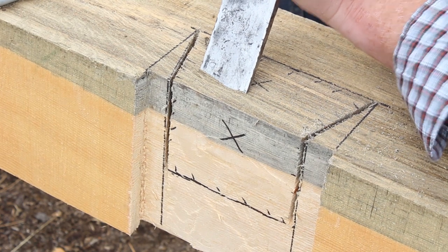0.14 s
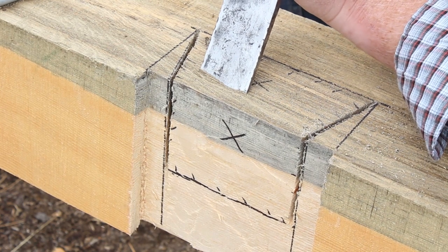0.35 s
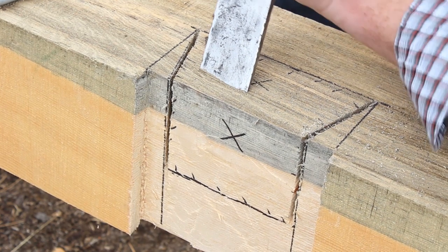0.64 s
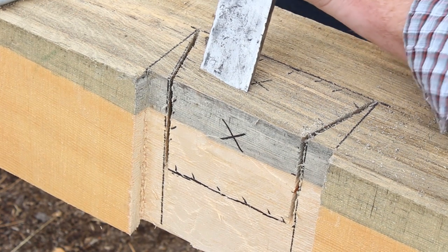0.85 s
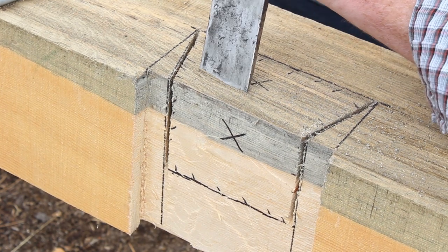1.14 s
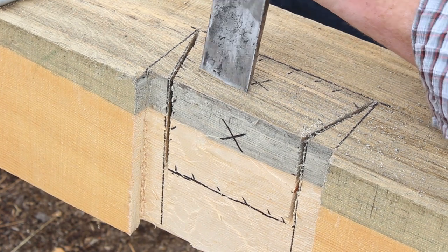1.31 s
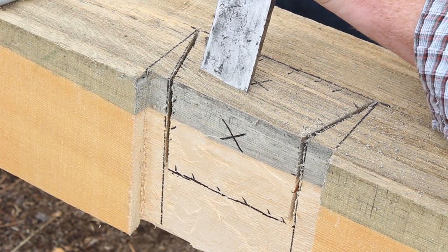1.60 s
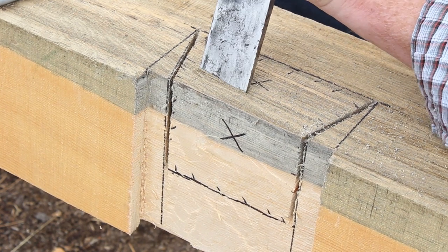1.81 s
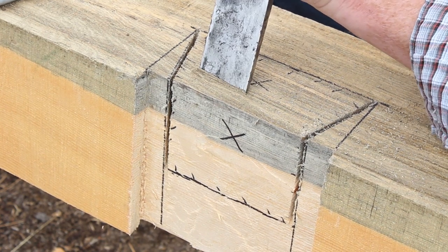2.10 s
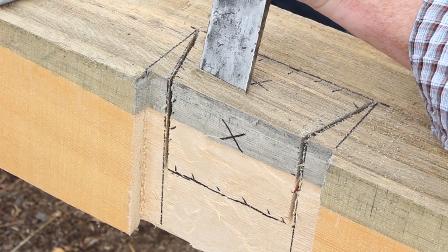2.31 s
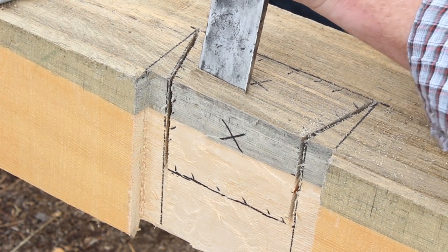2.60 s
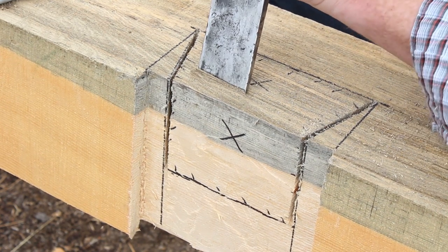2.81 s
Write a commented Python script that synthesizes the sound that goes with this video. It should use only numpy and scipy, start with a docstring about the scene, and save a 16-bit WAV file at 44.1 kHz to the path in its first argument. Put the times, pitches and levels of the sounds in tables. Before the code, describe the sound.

Mallet striking a chisel in a timber beam, woody knocks with rattle, a far bird whistling outdoors

```python
"""Quiet outdoor air carries the tail of a mallet blow, then six more blows on a chisel in a timber beam.
Each blow layers a noise crack with ringing handle modes, a beam thump and a short bedded-chisel ring.
The jolted trestles sway as wavering modes, shudder in noise knocks and rattle in a chatter of ticks;
a faint noise wash answers from the yard. Between the early blows a far bird whistles in gliding sines
with an echo, and the filtered-noise air swells slowly, then eases."""
import sys
import numpy as np
from scipy import signal
from scipy.fft import rfft, irfft, next_fast_len
from scipy.io import wavfile

SR = 44100
rng = np.random.default_rng(int(sys.argv[2]) if len(sys.argv) > 2 else 0)


def log_audio(samples):
    """Write samples as a 16-bit WAV file to the path given in sys.argv[1]."""
    # one column per channel
    frames = np.atleast_2d(samples).T
    # limit to full scale, then quantise
    limited = np.clip(frames, -1, 1)
    pcm = np.round(limited * 32767).astype(np.int16)
    wavfile.write(sys.argv[1], SR, pcm)


N = 130095
T = np.arange(N) / SR

# mallet blows: (t/s, thump/dB, chisel ring/dB, crack/dB, crack edge/dB, shudder/dB, rattle/dB,
# beam pitch/ratio, chisel pitch/ratio, blade/dB, chisel ring time/ratio), levels relative to each layer
BLOWS = [(-.07, 10, -4, 0.5, 0, -1, -4, 0.41, 1, 0, 1),
         (0.2011, -1.5, 4, 1.5, -5, -2.5, -1, 1.076, 1.065, -13.5, 0.85),
         (1.3217, -8.5, -17.5, -7, -3.5, -12, -7.5, 1.1, 0.988, -28, 3.44),
         (1.7305, -7.5, 0.5, 3, -4, -4, -7.5, 1.03, 1.0, -3, 1.13),
         (2.0229, 0, 8.5, 0, 2, -0.5, -19, 1.0, 1.04, 1.5, 0.33),
         (2.3234, -1, -1.5, 0, 1.5, 1.5, -0.5, 1.03, 1, 4.5, 1.1),
         (2.6155, -0.5, -1.5, 1, 1.5, 2, -0.5, 1.05, 0.97, 3, 1.03)]


def amp(db):
    """Decibels to gain."""
    return 10 ** (np.asarray(db) / 20)


def over_hz(points, hz):
    """Read (f/Hz, value) points on a log-frequency axis."""
    f, v = np.array(points, float).T
    return np.interp(np.log(np.maximum(hz, 1)), np.log(f), v)


def colour(x, points):
    """Minimum-phase filter of unit energy; the (f/Hz, level/dB) points set only its spectral shape."""
    size = 2048
    cepstrum = irfft(np.log(amp(over_hz(points, np.fft.rfftfreq(size, 1 / SR)))))
    # fold the cepstrum forward in time so the filter is causal
    cepstrum[1:size // 2] *= 2
    cepstrum[size // 2 + 1:] = 0
    response = irfft(np.exp(rfft(cepstrum)))
    return signal.fftconvolve(x, response / np.linalg.norm(response))[:len(x)]


def envelope(rise_s, t60_s):
    """Exponential rise and 60 dB fall, one second long; rise_s is a time constant."""
    t = T[:SR]
    rise = 1 - np.exp(-t / rise_s)
    return rise * np.exp(-np.log(1000) * t / t60_s)


def burst(rise_s, t60_s):
    """Dying white noise."""
    return rng.standard_normal(SR) * envelope(rise_s, t60_s)


def clicks(per_s):
    """One second of sparse random clicks, scaled to unit power on average."""
    struck = rng.random(SR) < per_s / SR
    return struck * rng.standard_normal(SR) * np.sqrt(SR / per_s)


def drift(per_s):
    """One second of random wandering, straight lines between per_s random points."""
    return np.interp(T[:SR] * per_s, np.arange(per_s + 1), rng.standard_normal(per_s + 1))


def ring(modes, pitch, rise_s, wander=0, beat_db=0):
    """Struck modes with levels scattered from blow to blow; loose joints make pitch and level wander."""
    scatter_db = 1.2
    out = 0
    for hz, db, t60 in modes:
        bend, swell = drift(20), drift(20)
        phase = 2 * np.pi * hz * np.cumsum(pitch + wander * bend) / SR
        level_db = db + scatter_db * rng.standard_normal() + beat_db * swell
        out = out + amp(level_db) * envelope(rise_s, t60) * np.sin(phase)
    return out


def add(out, start_s, x):
    """Mix x into out at a time, trimming what falls outside."""
    i = int(round(start_s * SR))
    a, b = max(i, 0), min(i + len(x), N)
    out[a:b] += x[a - i:b - i]


def air():
    """Soft outdoor wash: coloured noise in mid and side, swelling slowly."""
    # outdoor air spectrum: (f/Hz, relative level/dB)
    air_shape = [(25, -19), (59, -12), (145, -13), (404, -8.5), (822, -16.5), (1760, -17), (16000, -37.5)]
    # slow swell of the wash: (t/s, mid level/dB)
    air_swell = [(0, -57.5), (.9, -54), (1.65, -56.5)]
    side_gain = 0.89
    mid, side = (colour(rng.standard_normal(N), air_shape) for _ in range(2))
    swell = amp(np.interp(T, *np.array(air_swell).T))
    return swell * (mid + side_gain * np.array([side, -side]))


def bird():
    """Far pure whistles that glide, waver and flutter, with a diffuse echo from the trees."""
    # notes: (start t/s, length/s, start f/Hz, middle f/Hz, end f/Hz, level/dB), before waver and flutter
    notes = [(0.374, 0.1, 2690, 2690, 2440, -48.5), (0.459, 0.025, 2260, 1930, 1870, -44),
             (0.516, 0.028, 2400, 2870, 2780, -46.5), (.54, 0.027, 2450, 2107, 1980, -45.5),
             (0.956, 0.13, 2900, 3000, 3250, -55), (0.945, .11, 2130, 2310, 2390, -53.5),
             (1.066, 0.031, 2700, 2580, 2600, -45), (1.089, 0.038, 2780, 3140, 3120, -44),
             (1.126, 0.062, 2663, 2622, 2340, -44), (1.18, .06, 2400, 2350, 2290, -53),
             (1.241, 0.022, 2600, 1750, 1400, -50), (1.569, 0.034, 3300, 2590, 2850, -52)]
    waver_depth, flutter_db, waver_points_per_s = .014, 2, 150
    right_over_left_db, echo_db = 8.5, -5
    song = np.zeros(N)
    for start_s, length_s, start_hz, middle_hz, end_hz, db in notes:
        u = np.linspace(0, 1, int(length_s * SR))
        glide = np.polyfit([0, .5, 1], [start_hz, middle_hz, end_hz], 2)
        waver, flutter = (drift(waver_points_per_s)[:len(u)] for _ in range(2))
        hz = np.polyval(glide, u) * (1 + waver_depth * waver)
        whistle = np.sin(np.pi * u) * np.sin(2 * np.pi * np.cumsum(hz) / SR)
        add(song, start_s, amp(db + flutter_db * flutter) * whistle)
    direct = song * amp(np.array([[-right_over_left_db], [right_over_left_db]]) / 2)
    # one independent echo tail per side
    trees = [burst(rise_s=0.024, t60_s=1) for _ in range(2)]
    echo = np.array([signal.fftconvolve(song, h / np.linalg.norm(h))[:N] for h in trees])
    return direct + amp(echo_db) * echo


def yard():
    """Scattered reflections as a slow-rising noise tail on each blow, for one microphone."""
    # yard reflection spectrum: (f/Hz, relative level/dB)
    yard_shape = [(100, -1.5), (300, 1), (900, -2), (2500, -10.5), (7000, -19.5), (15000, -49)]
    yard_db = -37
    out = np.zeros(N)
    for t, _, _, crack_db, *_ in BLOWS:
        add(out, t, amp(yard_db + crack_db) * burst(rise_s=0.024, t60_s=0.48))
    return colour(out, yard_shape)


def sway():
    """Jolted trestles rock in slow-rising, wandering modes; the beam drops back with small knocks."""
    # trestle modes: (f/Hz before the pitch ratio, level/dB before the blow's level, t60/s)
    trestle_modes = [(72.2, -23, 0.64), (138, -43.5, 1), (189.26, -26, 0.45), (280.7, -23.5, 0.37),
                     (395, -27.5, 0.37), (501, -26, 0.27)]
    # wooden knocks as the beam drops back: (t/s, level/dB added to its modes)
    rebounds = [(1.762, -4), (1.812, -10), (1.833, -13), (2.056, -2), (2.355, 1), (2.647, 1.5)]
    # modes of those knocks: (f/Hz, level/dB before each knock's level, t60/s)
    knock_modes = [(637, -27, 0.086), (943, -25.5, 0.07), (1082, -24.5, 0.062), (1243, -35.5, 0.13)]
    out = np.zeros(N)
    for t, _, _, _, _, shudder_db, *_ in BLOWS:
        rocking = ring(trestle_modes, pitch=0.97, rise_s=0.037, wander=.015, beat_db=3)
        add(out, t, amp(shudder_db) * rocking)
    for t, db in rebounds:
        add(out, t, amp(db) * ring(knock_modes, pitch=1, rise_s=0.0018))
    return out


def shudder():
    """The beam shudders on its trestles: dense random knocks that die away, darkened by a filter."""
    # shudder spectrum: (f/Hz, relative level/dB)
    shudder_shape = [(60, -14.5), (110, 3.5), (190, 7.5), (290, -6), (450, -4.5), (750, -6), (1200, -18),
                     (3000, -28), (8000, -50)]
    base_db, knocks_per_s = -23, 990
    out = np.zeros(N)
    for t, _, _, _, _, shudder_db, *_ in BLOWS:
        knocks = clicks(knocks_per_s) * envelope(rise_s=.012, t60_s=0.4)
        add(out, t, amp(base_db + shudder_db) * knocks)
    return colour(out, shudder_shape)


def tick():
    """A sharp contact spike and its short noise scrape."""
    snap = 3.5  # spike height over the scrape's noise
    return snap * signal.unit_impulse(SR) + burst(rise_s=.0002, t60_s=.019)


def rattle():
    """Loose parts chatter as a swelling cloud of ticks, with clear single ticks on top."""
    # clearest ticks: (t/s, level/dB added to the tick base level)
    clear_ticks = [(.215, -2), (.2465, 0), (.2735, 1), (.3205, -8), (1.745, 0), (1.774, 1), (1.807, -6),
                   (1.8595, -10), (2.036, 2), (2.045, -3), (2.0785, 1), (2.1005, -3), (2.114, -1),
                   (2.1365, -3), (2.336, 0), (2.3805, -1), (2.398, -3), (2.42, 0), (2.6606, -2), (2.681, 4),
                   (2.689, 3), (2.702, 0), (2.712, 2), (2.731, -4), (2.744, -2), (2.762, -7)]
    # spectrum of ticks and chatter: (f/Hz, relative level/dB)
    rattle_shape = [(500, 14), (1200, 8), (1900, -7), (2800, 3), (4500, -3), (5500, -1.5), (8500, -4.5),
                    (11500, -18), (15500, -27)]
    chatter_db, tick_db = -43.5, -30.5
    peak_s, rattles_per_s = .04, 450
    age = T[:SR] / peak_s
    swell = age * np.exp(1 - age)
    hits = np.zeros(N)
    for t, _, _, _, _, _, rattle_db, *_ in BLOWS:
        add(hits, t, amp(chatter_db + rattle_db) * clicks(rattles_per_s) * swell)
    grain = tick()
    out = signal.fftconvolve(hits, grain / np.linalg.norm(grain))[:N]
    for t, db in clear_ticks:
        add(out, t, amp(tick_db + db) * tick())
    return colour(out, rattle_shape)


def chisel():
    """The steel blade rings brightly at the blow; the chisel bedded in the wood rings a moment later."""
    # bright blade modes: (f/Hz before the pitch ratio, level/dB before the blow's level, t60/s)
    blade_modes = [(3850, -8.5, 0.012), (4210, -13, 0.015)]
    # bedded chisel modes: (f/Hz before the pitch ratio, level/dB before the blow's level,
    # t60/s before the ring time ratio)
    chisel_modes = [(398.7, -1.5, 0.047), (782.5, -4, 0.033), (1169, -4, 0.016)]
    lag_s, rise_s = 0.004103, .001
    out = np.zeros(N)
    for t, _, ring_db, *_, chisel_pitch, blade_db, sustain in BLOWS:
        add(out, t, amp(blade_db) * ring(blade_modes, 0.97, rise_s))
        stretch = max(sustain, .5)  # never shorter than half the ring time
        bedded = [(hz, db, t60 * stretch) for hz, db, t60 in chisel_modes]
        add(out, t + lag_s, amp(ring_db) * ring(bedded, chisel_pitch, rise_s))
    return out


def thump():
    """The pushed beam answers with low, quickly damped modes."""
    # beam modes: (f/Hz before the pitch ratio, level/dB before the blow's level, t60/s)
    beam_modes = [(146.3, -14, 0.14), (185, 0.5, 0.037), (226.5, 3.5, 0.038), (296.4, -20.5, 0.16),
                  (372, -6.5, 0.054), (411, -23.5, 0.24), (495, -19, 0.17), (625, -4, 0.05),
                  (821, -15.5, 0.099)]
    out = np.zeros(N)
    for t, thump_db, *_, beam_pitch, _, _, _ in BLOWS:
        add(out, t, amp(thump_db) * ring(beam_modes, beam_pitch, rise_s=0.0032))
    return out


def crack():
    """The mallet hits the handle: a woody noise body, ringing handle modes and a bright contact edge."""
    # woody body spectrum: (f/Hz, relative level/dB)
    body_shape = [(500, 2.5), (1200, -1.5), (2100, -5.5), (3500, -10.5), (4800, -18.5), (9000, -25.5),
                  (16000, -37.5)]
    # bright edge spectrum: (f/Hz, relative level/dB)
    edge_shape = [(3000, -23), (5000, -10.5), (7300, 5.5), (8600, 2.5), (10000, -3), (11800, -3.5),
                  (14000, -12), (16500, -40)]
    # handle modes: (f/Hz before the pitch ratio, level/dB before the blow's level, t60/s)
    handle_modes = [(1123, -19, 0.069), (1390, -26.5, 0.064), (1586, -23.5, 0.036), (1715, -17.5, 0.04),
                    (1872, -33.5, 0.075), (2568, -17, 0.025), (3064, -7.5, 0.0052)]
    body_base_db, edge_base_db, rise_s = -9.5, -9.5, 0.00025
    edge_snap = 3.06  # height of the first contact spike over the crackle that follows
    out = np.zeros(N)
    for t, _, _, crack_db, edge_db, *_ in BLOWS:
        body = amp(body_base_db) * colour(burst(rise_s, t60_s=0.03), body_shape)
        handle = ring(handle_modes, 0.98, rise_s)
        contact = edge_snap * signal.unit_impulse(SR) + burst(rise_s, t60_s=0.006)
        edge = amp(edge_base_db + edge_db) * colour(contact, edge_shape)
        add(out, t, amp(crack_db) * (body + handle + edge))
    return out


def microphones(x):
    """Near sound reaches two microphones with level and phase offsets, split evenly between them."""
    # level offset: (f/Hz, left minus right/dB)
    balance = [(550, 0.1), (1100, -1), (2000, -1), (4000, -0.5), (13000, 0.3)]
    # phase offset: (f/Hz, left lead/rad)
    lead = [(120, -0.052), (300, 0.13), (650, 0.45), (1100, -0.65), (1500, -0.48), (3000, -0.67),
            (4650, 0.96), (6800, -1.2), (8800, 0.83), (12700, -0.74)]
    size = next_fast_len(N + SR)
    hz = np.fft.rfftfreq(size, 1 / SR)
    half = amp(over_hz(balance, hz) / 2) * np.exp(.5j * over_hz(lead, hz))
    return irfft(rfft(x, size) * np.array([half, 1 / half]), size)[:, :N]


def scene():
    """Air, bird and an independent yard wash per side behind the near woodwork."""
    trestles = sway() + shudder() + rattle()
    blows = chisel() + thump() + crack()
    return air() + bird() + np.array([yard(), yard()]) + microphones(trestles + blows)


def record(dry):
    """The recorder thins the deep bass, rounds off the highest peaks and cuts the top."""
    low_cut_hz, ceiling, top_hz = 74, .9, 16600
    x = signal.sosfilt(signal.butter(2, low_cut_hz, "high", fs=SR, output="sos"), dry)
    limited = x / (1 + (x / ceiling) ** 6) ** (1 / 6)
    return signal.sosfilt(signal.ellip(8, .2, 70, top_hz, fs=SR, output="sos"), limited)


dry = scene()
out = record(dry)
log_audio(out)
```